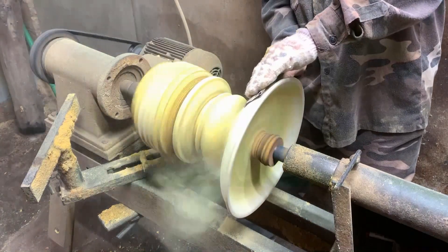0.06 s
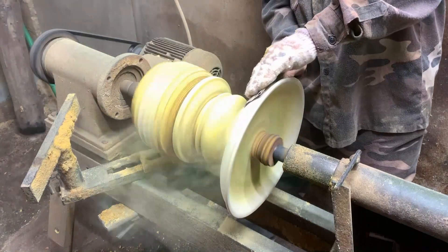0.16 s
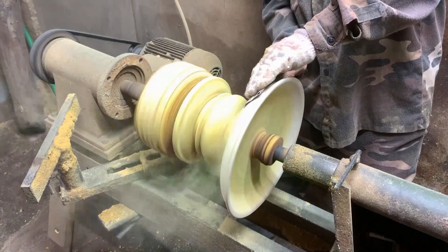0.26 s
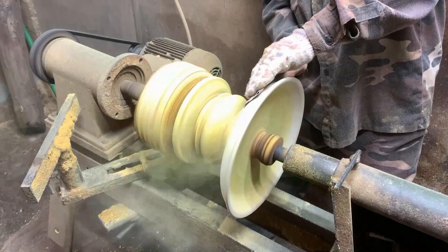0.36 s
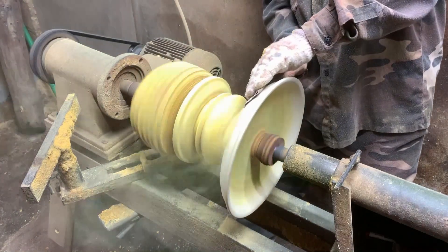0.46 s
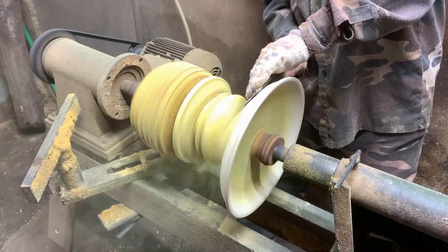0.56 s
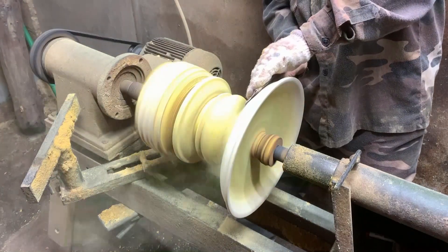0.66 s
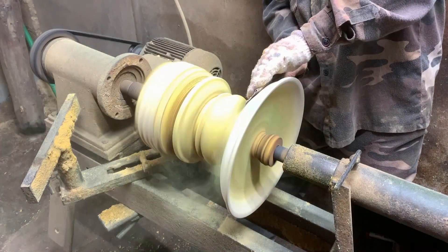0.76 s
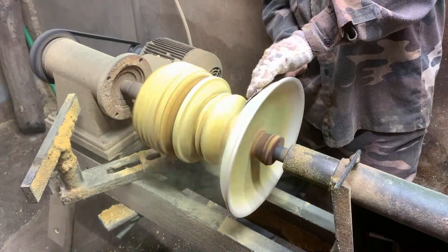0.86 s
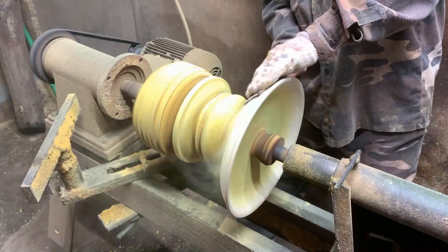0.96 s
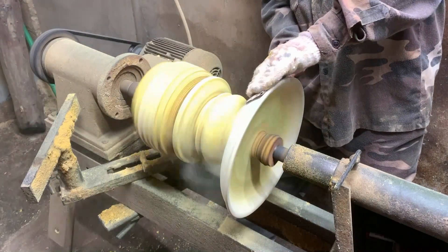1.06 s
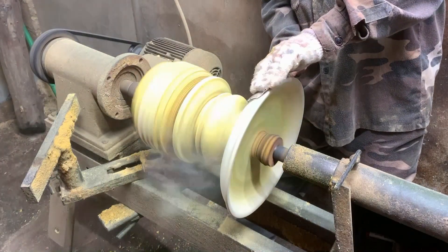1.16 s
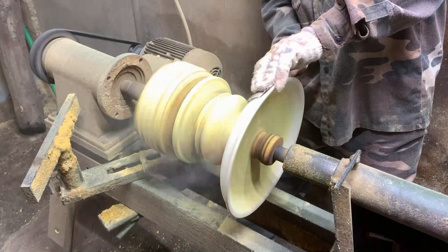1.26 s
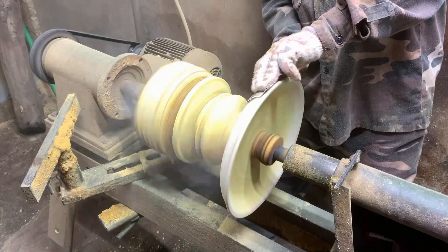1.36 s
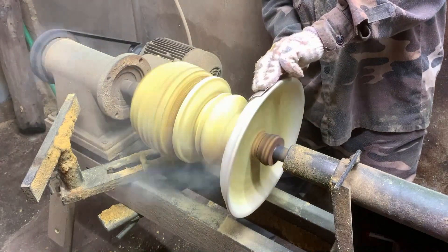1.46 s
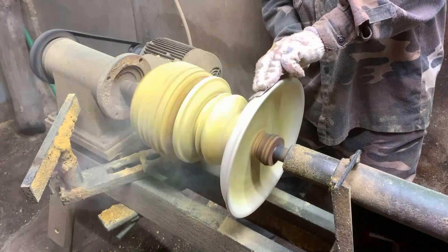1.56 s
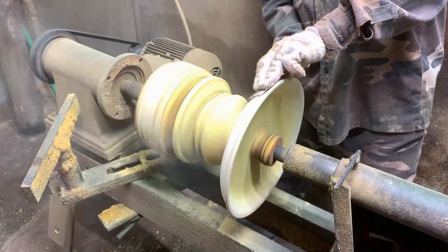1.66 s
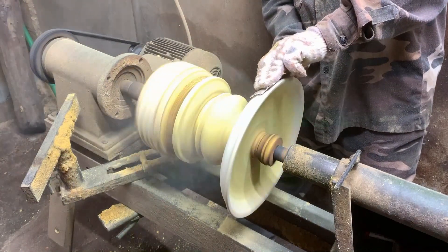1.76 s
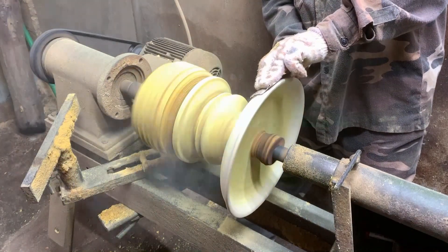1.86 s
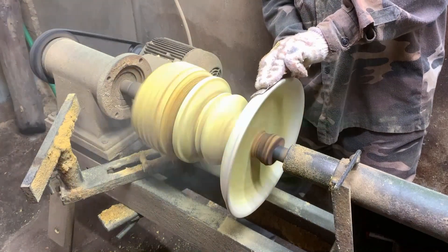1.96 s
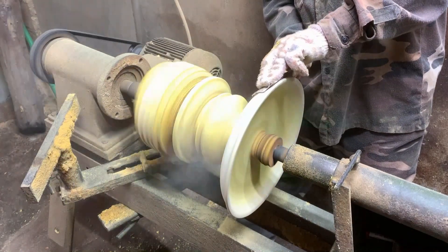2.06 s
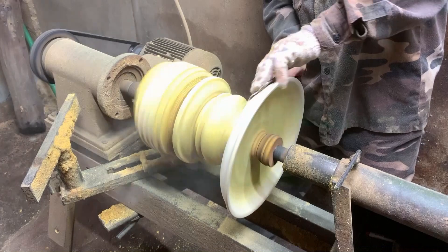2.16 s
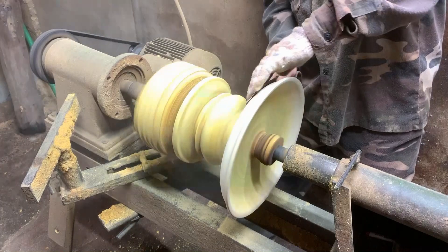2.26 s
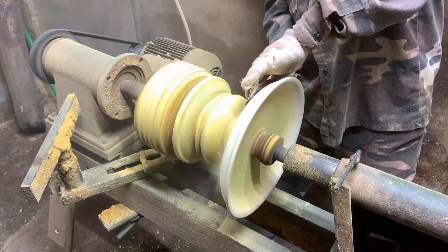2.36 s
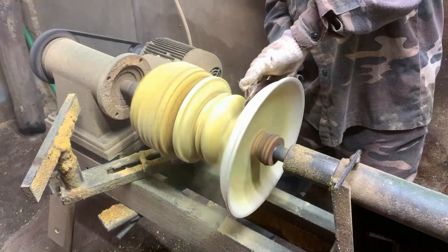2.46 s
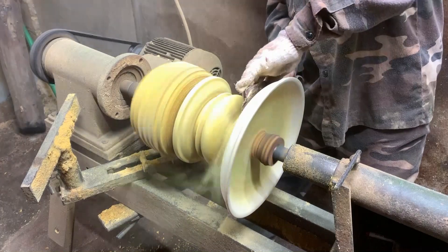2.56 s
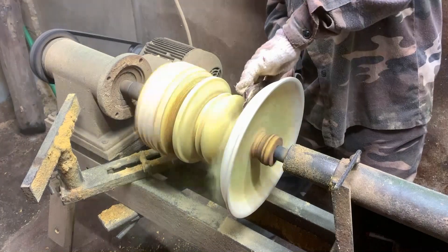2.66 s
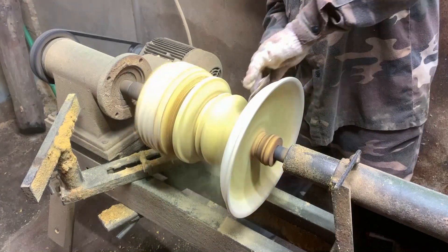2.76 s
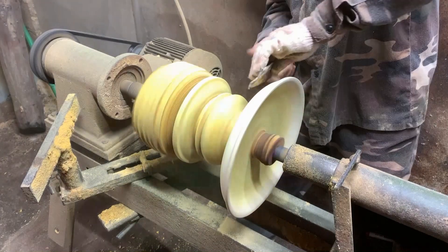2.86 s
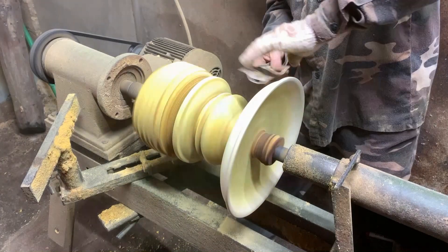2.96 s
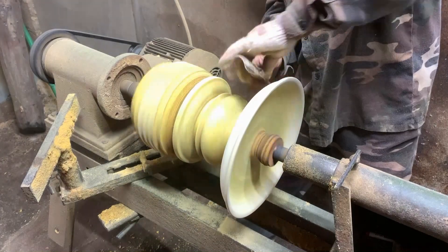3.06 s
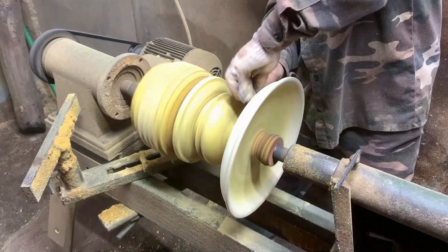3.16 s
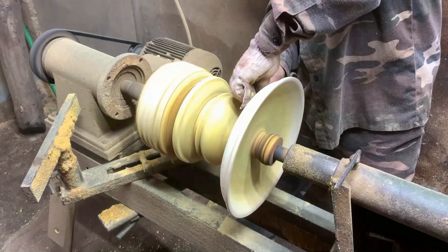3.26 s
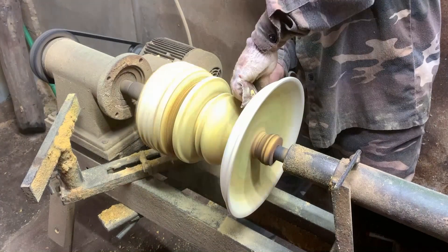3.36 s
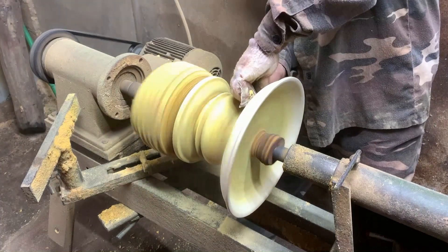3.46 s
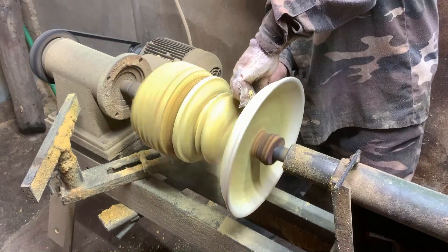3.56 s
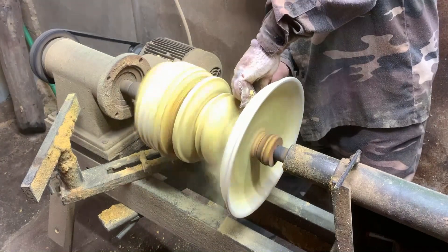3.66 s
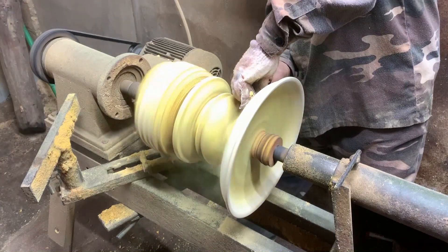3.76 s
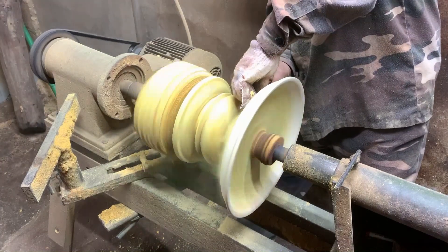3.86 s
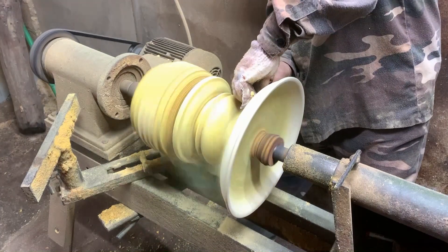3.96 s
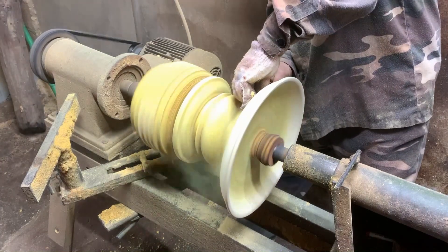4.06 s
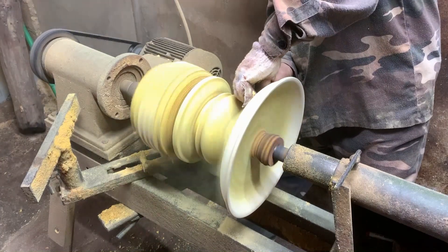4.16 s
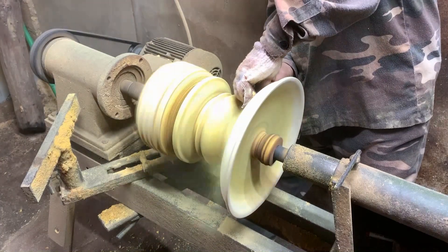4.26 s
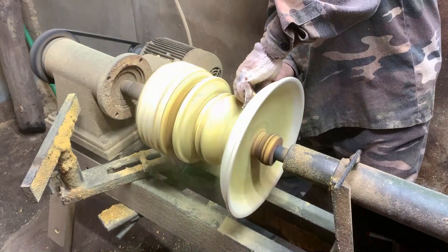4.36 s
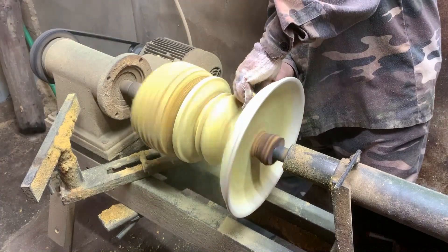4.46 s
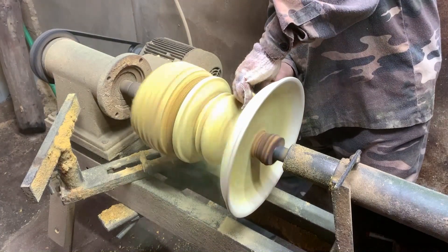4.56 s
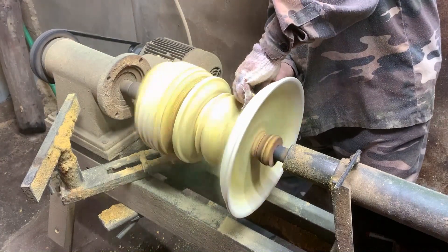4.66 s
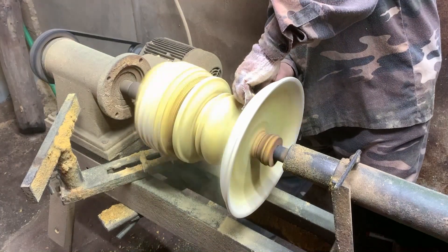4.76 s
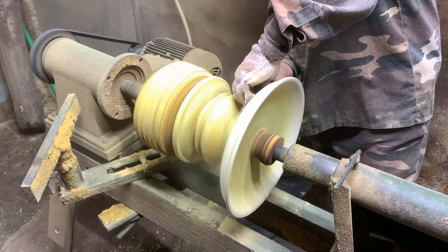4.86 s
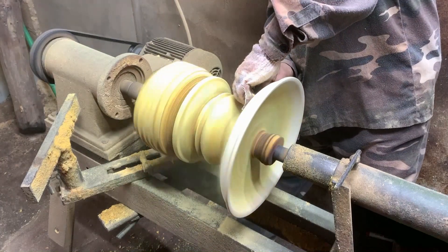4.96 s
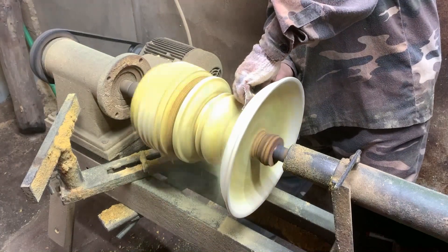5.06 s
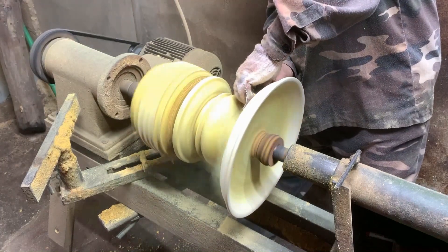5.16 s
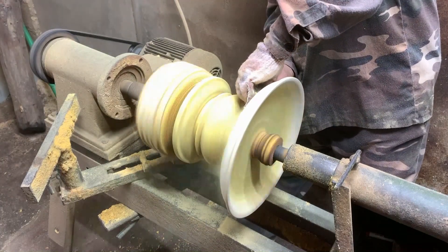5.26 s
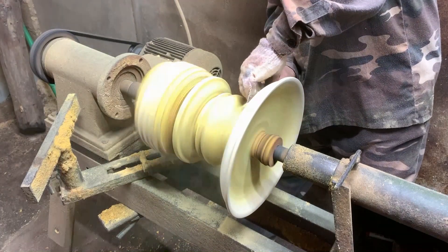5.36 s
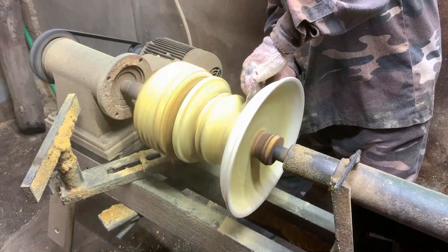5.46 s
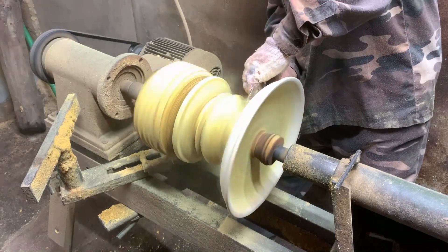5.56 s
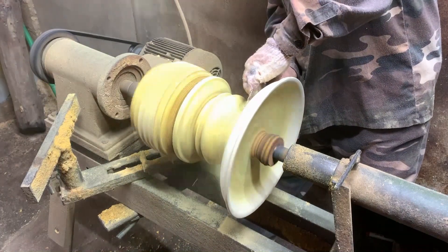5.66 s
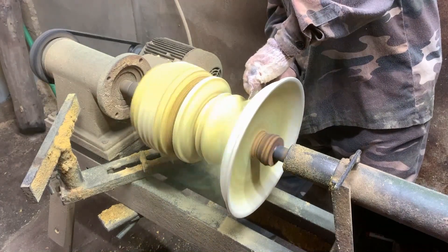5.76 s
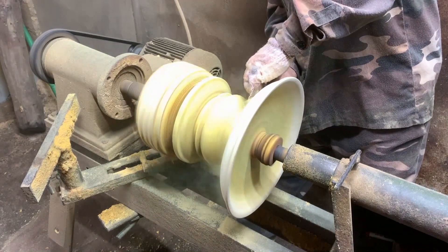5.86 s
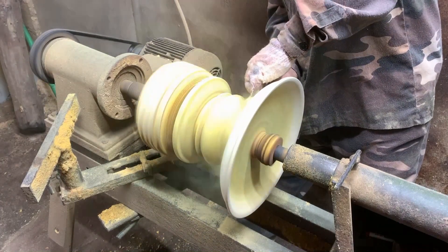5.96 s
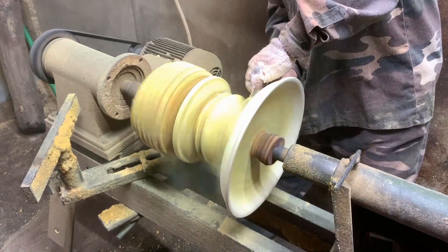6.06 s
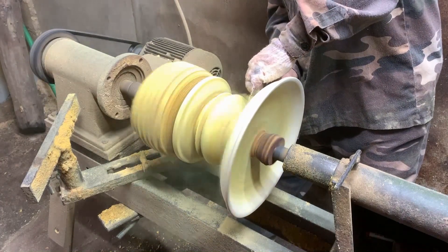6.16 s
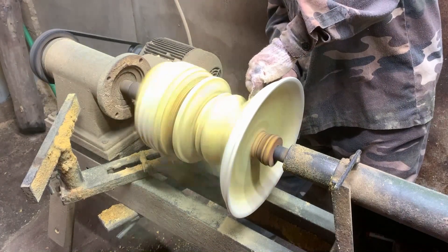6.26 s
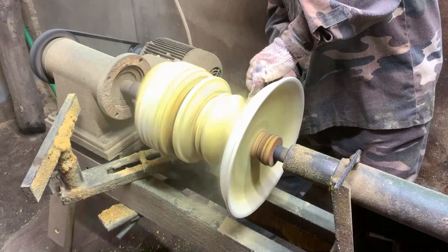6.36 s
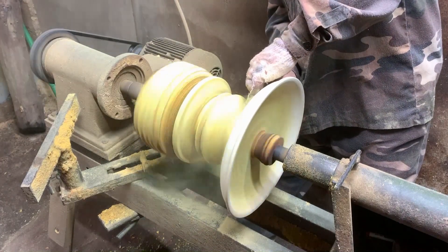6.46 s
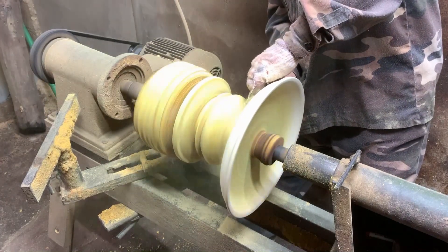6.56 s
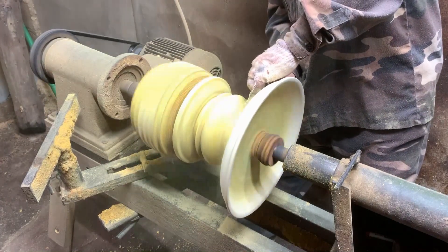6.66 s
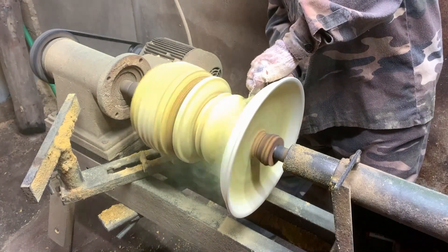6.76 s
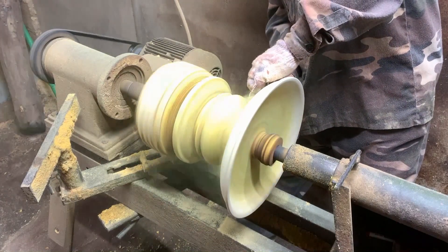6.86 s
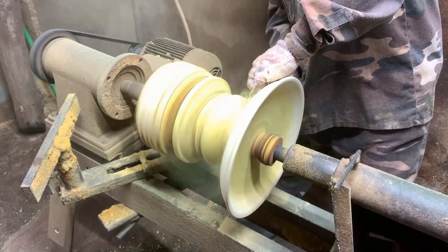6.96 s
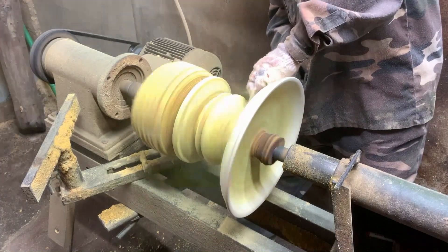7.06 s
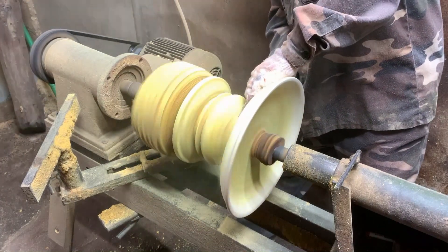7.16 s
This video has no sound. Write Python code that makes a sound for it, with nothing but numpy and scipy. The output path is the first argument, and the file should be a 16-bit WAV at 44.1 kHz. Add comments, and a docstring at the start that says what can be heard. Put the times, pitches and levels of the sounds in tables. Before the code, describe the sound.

A close stereo microphone in a workshop picks up sandpaper on wood spinning fast in a lathe. From 0 s a dense, dry, gritty hiss dominates, bright and finely uneven, easing around 0.6 s and pressing harder near 1.1 s, with a tiny dip at 2.2 s. Underneath are a softer broadband motor and bearing whirr, rapidly throbbing hollow resonances and very faint high whines. At about 2.8 s the paper lifts and the hiss cuts out, exposing the machine; one barely audible tick falls near 3.0 s. At 3.2 s the paper lands softly and sanding resumes, stronger at 3.5 s, lighter around 4.5 s and 5-5.6 s, with more body, then firmer and raspier from 6 s to the end at about 7.2 s. Low, lumpy draught rumbles throughout, with thumping air buffets near 0.25, 2.8, 3.7 and 4.6 s, the biggest at 5.2 s.

```python
"""In a workshop a wood lathe drones while sandpaper hisses on a spinning bowl, is lifted once and put back.
Sanding is a dense hail of uneven scratches, filtered by grit, hand pressure and place on the bowl.
The lathe is filtered noise, resonances throbbing twice a turn, and faint whines; one thin tick is heard.
A draught at two microphone ports is lumpy low noise with single swings of pressure that fall in pitch."""
import sys
import numpy as np
from scipy import signal
from scipy.fft import rfft, irfft, next_fast_len
from scipy.io import wavfile
from scipy.ndimage import uniform_filter1d

SR = 44100
rng = np.random.default_rng(int(sys.argv[2]) if len(sys.argv) > 2 else 0)


def bounce(signal):
    """Save signal as a 16-bit WAV file at the path given by the first command-line argument."""
    frames = np.transpose(np.atleast_2d(signal))
    limited = np.clip(frames, -1, 1)
    pcm = np.round(limited * 32767).astype(np.int16)
    wavfile.write(sys.argv[1], SR, pcm)


N = 318395
SIZE = next_fast_len(N)  # transform length

# Contacts of paper and wood: down_s, lifted_s
CONTACTS = [(-1, 2.766), (3.212, 9)]
# Pressure of the hand, as base level of the hiss: time_s, level_db
PRESSURE = [(0, -29.7), (.4, -30), (.62, -33.8), (.88, -32), (1.03, -27.8), (1.2, -27.5), (1.5, -30.5),
            (2.05, -30), (2.45, -30), (2.8, -31), (3.26, -31), (3.52, -28.3), (3.95, -31.5), (4.45, -35.5),
            (4.75, -31.5), (5.0, -34), (5.6, -34.2), (5.9, -31.8), (6.45, -29.5), (6.8, -32.5), (7.0, -31),
            (7.22, -28.5)]
# Brief dips of the hiss, including the soft start of the landing:
# time_s, depth_db, half_length_s (Gaussian sigma), fizz_kept_db
HISS_DIPS = [(2.235, -8, .04, 4.5), (3.215, -12, .027, -1), (3.325, -5.5, .035, 0), (7.075, -4, .02, 0)]
# Spectrum of the grit, relative: frequency_hz, density_db (per Hz)
GRIT_SPECTRUM = [(300, -35), (1000, -11), (2000, -9.5), (3000, -5.5), (4500, -2.5), (6500, -4), (7800, -6),
                 (8200, -5), (9200, -6.5), (9800, -8), (11000, -9), (13000, -14), (15500, -23.5)]
# Bands of body, scratch, rasp and fizz: centre_hz, width (log ratio), share of pressure changes ignored (0-1)
HISS_BANDS = [(1500, .3, .9), (4300, 0.15, .1), (6900, 0.16, .1), (11000, 0.7, .6)]
# Colour as the paper travels over the bowl: time_s, body_db, scratch_db, rasp_db, fizz_db
TRAVEL_COLOUR = [(0, -3, 0, 1, 2.5), (1.1, -3, .5, 1.5, 2), (1.9, -1, 0, .5, 4), (2.4, 1, .5, 2, 0),
                 (3.6, 2, 0, 0, 2), (4.3, 4, 2.5, 2, 1.5), (4.75, 5, 0, 3, -.5), (5.3, 6, 1, 3, 1.5),
                 (6.1, 2, 4.5, 5, -1), (7.22, 1, 3, 4, -1.5)]
# Spectrum of motor, belt and bearings, relative: frequency_hz, density_db (per Hz)
DRONE_SPECTRUM = [(150, -53), (250, -11.5), (400, -13), (620, -12.5), (900, -10), (1050, -15.5),
                  (1450, -12.5), (2000, -15), (3950, -28.5), (6820, -34), (9000, -45), (10300, -48),
                  (12700, -38), (13200, -66)]
# Resonances of the lathe: frequency_hz, width_hz (before WIDTH_SCALE), relative_peak_db
LATHE_MODES = [(797, 84, -2), (880, 88, -11), (1475, 64, -12.5), (1670, 86, -10.5), (1773, 89, -10.5),
               (2580, 66, -18.5), (5010, 130, -20), (5970, 130, -19), (6680, 90, -21), (6900, 90, -22)]
# Loudness of the resonances together: time_s, level_db
MODE_LEVEL = [(0, -41), (1.5, -41), (3.0, -40), (3.8, -37.5), (5.0, -36.5), (7.22, -36)]
# Whines of the drive: frequency_hz, level_db (before flutter)
WHINES = [(10907, -75), (12016, -65.5), (12801, -80)]
# Strength of the draught: time_s, level_db (before lumps), boost_above_200_hz_db (before flicker)
DRAUGHT_STRENGTH = [(0, -34.5, -4), (.12, -35, -5), (.3, -27.5, -1), (.52, -42, -8), (.78, -40.5, 2),
                    (.9, -33, -4), (1.07, -46, 2), (1.27, -36.5, 0), (1.57, -35, 0), (1.72, -43.5, -5),
                    (2.03, -31.5, -3), (2.15, -37, 0), (2.26, -32.5, -2), (2.44, -40, 0), (2.6, -32.5, -1),
                    (2.82, -30, -4), (3.05, -31, -7), (3.25, -36, 0), (3.4, -46, 6), (3.6, -40, 2),
                    (3.72, -33, 5), (3.93, -34, 0), (4.08, -45, -2), (4.5, -29.5, -3), (4.62, -35, 0),
                    (4.74, -29, 4), (4.96, -46, 2), (5.19, -24, 3), (5.3, -28.5, 0), (5.47, -26, -7),
                    (5.66, -42, 4), (5.87, -32, -3), (6.1, -35, 2), (6.22, -39, 0), (6.62, -36, 2),
                    (6.77, -29, -2), (6.9, -35.5, -3), (7.1, -36.5, 4), (7.22, -29, 7)]
# Spectrum of the turbulence, relative: frequency_hz, density_db (per Hz)
TURBULENCE_SPECTRUM = [(8.8, -43), (15, -8), (86, -0.5), (286, -10.5), (521, -17.5), (650, -18), (840, -49),
                       (1430, -120)]
# Single buffets: start_s, envelope_peak_db, settled_pitch_hz, snap_db (re swing), left_over_right_db
BUFFETS = [(0.241, -18.5, 140, -24, 0), (0.268, -18.5, 100, -5, 4), (1.613, -26.5, 94, -18, -4),
           (1.984, -25, 80.7, -24, -5), (2.275, -22, 99, -10, 1), (2.647, -26, 117, -20, 1.5),
           (2.773, -20.5, 96.9, -19, 0.5), (2.936, -23, 99.6, -24, -0.5), (3.673, -19, 74.4, -21, 5),
           (3.684, -18.5, 82, -1.5, -1), (3.747, -23, 101, -12, 0.0), (3.817, -24, 133, -7, 0.5),
           (4.516, -20.5, 61.9, -13, -5), (4.682, -20.5, 90, -1, 1), (4.749, -25.5, 96, -8, 7),
           (5.079, -21.5, 105, -17, -2), (5.16, -9.5, 77.5, -6, 0.5), (5.193, -22, 91.5, -9, -3),
           (5.346, -19, 85, -22, -1.0), (5.362, -20, 107, -19, -1), (5.398, -21.5, 111, -9.5, 1),
           (5.818, -23.5, 103, -18, 2), (6.147, -23, 78.1, -18, 0.5), (6.734, -21.5, 83.4, -23, -6),
           (6.798, -18.5, 85, -14, 4), (7.155, -25, 98, -0.5, 1)]
# Treble resonance of the right port: frequency_hz, gain_db
RIGHT_PORT = [(7940, 0), (8030, 6.5), (9350, 6), (9850, 0)]

LAND_DB_PER_S, LIFT_DB_PER_S = 1000, 360  # slopes at which the hiss comes and goes
USUAL_PRESSURE_DB = -31
TURNS_PER_S = 17.7
DRONE_DB = -38.5
WIDTH_SCALE = 1.22  # table width to full width at half amplitude
TICK_S, TICK_DB, TICK_DECAY_S = 2.983, -51, 0.059  # decay time to -60 dB
BAND_LIMIT_HZ = 15740


def gain_of(db):
    """Decibel law: amplitude ratio of a level."""
    return 10 ** (np.asarray(db) / 20)


def evened(x):
    """Normalisation: scales a signal to rms 1."""
    return x / np.sqrt(np.mean(x ** 2) + 1e-20)


def noise():
    """White noise: equal power per hertz, independent in two channels."""
    return rng.standard_normal((2, N))


def read(points, hz):
    """Interpolation of a spectrum on a logarithmic frequency axis."""
    f, value = np.transpose(points)
    return np.interp(np.log(hz + 1), np.log(f + 1), value)


def coloured(x, points):
    """Linear filtering: multiplies the spectrum of x by the points' gains, then sets rms 1."""
    gains = gain_of(read(points, np.fft.rfftfreq(SIZE, 1 / SR)))
    return evened(irfft(rfft(x, SIZE) * gains, SIZE)[..., :N])


def wander(seconds, channels=2):
    """Low-pass fluctuation: noise averaged twice over the given time, rms 1."""
    span = max(round(seconds * SR), 1)
    once = uniform_filter1d(rng.standard_normal((channels, N)), span)
    return evened(uniform_filter1d(once, span))


def spin(order):
    """Periodicity of rotation: a cosine at a multiple of the spindle speed."""
    return np.cos(2 * np.pi * order * TURNS_PER_S * np.arange(N) / SR + 2 * np.pi * rng.random())


def hand(t):
    """Contact force: pressure level, dips with landing and lifting, and fizz kept in the dips, all in dB."""
    s, depth_db, half_s, kept_db = np.transpose(HISS_DIPS)
    dips = np.exp(-.5 * ((t[:, None] - s) / half_s) ** 2)
    fades = []
    for down, lifted in CONTACTS:
        landing = LAND_DB_PER_S * (t - down)
        lifting = LIFT_DB_PER_S * (lifted - t)
        fades.append(np.minimum(np.minimum(landing, lifting), 0))
    pressure_db = np.interp(t, *np.transpose(PRESSURE))
    return pressure_db, dips @ depth_db + np.max(fades, axis=0), dips @ kept_db


def sanding():
    """Abrasion noise: grit tears fibres in a hail of scratches; grain and run-out pulse with each turn."""
    hail = noise() * gain_of(1.87 * np.minimum(rng.exponential(1, N), 4))
    edge_band = signal.butter(1, [53, 64], "bandpass", fs=SR, output="sos")
    flutter = evened(signal.sosfilt(edge_band, rng.standard_normal(N)))  # the paper's free edge
    turn_db = .35 * spin(order=1) + .25 * spin(order=2)
    pulse_db = turn_db + .45 * flutter + 0.18 * wander(.03, channels=1)
    scratches = coloured(hail, GRIT_SPECTRUM) * gain_of(pulse_db)
    hz, t, z = signal.stft(scratches, SR, nperseg=512, noverlap=384)

    s, *columns = np.transpose(TRAVEL_COLOUR)
    *bands_db, fizz_db = (np.interp(t, s, c) for c in columns)
    pressure_db, dips_db, kept_db = hand(t)
    bands_db = bands_db + [fizz_db + kept_db]
    field_db = pressure_db + dips_db
    for (centre, width, ignored), band_db in zip(HISS_BANDS, bands_db):
        weight = np.exp(-.5 * (np.log((hz + 1) / centre) / width) ** 2)[:, None]
        field_db = field_db + weight * (band_db + ignored * (USUAL_PRESSURE_DB - pressure_db))

    # axis 1 is frequency, axis 2 is time
    across = uniform_filter1d(rng.standard_normal(z.shape), 7, 1)
    patches = evened(uniform_filter1d(across, 110, 2))  # the paper flexes
    # random brief narrow-band unevenness of the hiss
    streaks = evened(uniform_filter1d(rng.standard_normal(z.shape), 9, 2))
    sides_db = np.array([-.4, .4])[:, None, None]  # the work stands a little to the right
    z = z * gain_of(field_db + 0.84 * patches + 4.14 * streaks + sides_db)
    return signal.istft(z, SR, nperseg=512, noverlap=384)[1][:, :N]


def drone():
    """Broadband machine noise: motor, belt and bearings as noise of a steady spectrum."""
    return gain_of(DRONE_DB) * coloured(noise(), DRONE_SPECTRUM)


def resonances():
    """Modal resonance: noise that swells twice a turn excites the narrow modes of the lathe."""
    hz = np.fft.rfftfreq(SIZE, 1 / SR)
    modes = sum(gain_of(db) / (1 + (2 * (hz - f) / (WIDTH_SCALE * w)) ** 2) for f, w, db in LATHE_MODES)
    knocks_db = 3.3 * spin(order=2) + 1.82 * wander(0.026, channels=1) + 2.6 * wander(0.041)
    knocks = noise() * gain_of(knocks_db)
    rung = evened(irfft(rfft(knocks, SIZE) * modes, SIZE)[:, :N])
    return rung * gain_of(np.interp(np.arange(N) / SR, *np.transpose(MODE_LEVEL)))


def whines():
    """Phase and amplitude modulation: thin tones of the drive waver together and flutter in level."""
    t = np.arange(N) / SR
    waver = 1.3 * wander(.006)  # radians
    tones = sum(gain_of(db) * np.sqrt(2) * np.sin(2 * np.pi * f * t + waver) for f, db in WHINES)
    return tones * gain_of(2.8 * wander(.015))


def lathe():
    """Superposition of the lathe's broad drone, its throbbing resonances and its whines."""
    return drone() + resonances() + whines()


def draught():
    """Turbulent pressure: the ports share part of the low noise; the upper part flickers."""
    s, *columns = np.transpose(DRAUGHT_STRENGTH)
    level_db, bright_db = (np.interp(np.arange(N) / SR, s, c) for c in columns)
    shared, *own = rng.standard_normal((3, N))
    smooth = signal.butter(2, 200, fs=SR, output="sos")
    mixed = 0.71 * signal.sosfiltfilt(smooth, shared) + np.array(own)
    air = coloured(mixed, TURBULENCE_SPECTRUM)
    low = signal.sosfiltfilt(smooth, air)
    flicker_db = 4.0 * wander(0.011, channels=1)
    high = gain_of(bright_db + flicker_db) * (air - low)
    lumps_db = 1.8 * wander(.015, channels=1) + 2.2 * wander(.015)
    return (low + high) * gain_of(level_db + lumps_db)


def buffets():
    """Transient pressure pulses: a short swing falling in pitch, with a quicker falling snap."""
    out, t = np.zeros((2, N + SR)), np.arange(SR // 10) / SR
    chance = rng.random((len(BUFFETS), 2))
    # both envelopes peak at 1, after 7 ms and 2.5 ms
    swing_envelope = t / .007 * np.exp(1 - t / .007)
    snap_envelope = t / .0025 * np.exp(1 - t / .0025)
    snap_cycles = 200 * t + 1.26 * (1 - np.exp(-t / 0.0041))  # falls from about 507 to 200 Hz
    for (s, db, hz, snap_db, pan_db), (phase, skew) in zip(BUFFETS, chance):
        start = 2 * np.pi * (phase + np.outer([.5, -.5], .5 * (skew - .5)))  # the ports are not quite in step
        swing_cycles = hz * (t + .007 * (1 - np.exp(-t / .005)))  # starts at 2.4 times its settled pitch
        swing = np.sin(2 * np.pi * swing_cycles + start) * swing_envelope
        snap = np.sin(2 * np.pi * snap_cycles + start) * snap_envelope
        sides = gain_of(db + np.outer([.5, -.5], pan_db))
        at = round(s * SR)
        out[:, at:at + len(t)] += sides * (swing + gain_of(snap_db) * snap)
    return out[:, :N]


def tick():
    """Exponential decay: one faint burst of treble noise while the paper is off the wood."""
    after = np.arange(N) / SR - TICK_S
    spectrum = [(5000, -25), (8500, -3), (11300, 0), (12500, -25), (13500, -60)]  # Hz, relative dB
    decay = (after > 0) * gain_of(-60 * np.clip(after, 0, 1) / TICK_DECAY_S)
    return gain_of(TICK_DB) * coloured(noise(), spectrum) * decay


def scene():
    """Superposition: the pressures of all sources add."""
    return sanding() + lathe() + draught() + buffets() + tick()


def record(dry):
    """Linear reception: the right port colours the treble, then a low-pass filter limits the band."""
    port_db = read(RIGHT_PORT, np.fft.rfftfreq(SIZE, 1 / SR))
    ring = gain_of(np.outer([0, 1], port_db))  # left flat, right ringing
    heard = irfft(rfft(dry, SIZE) * ring, SIZE)[:, :N]
    low_pass = signal.firwin(2047, BAND_LIMIT_HZ, window=("kaiser", 9), fs=SR)
    return signal.oaconvolve(heard, low_pass[None], "same")


dry = scene()
out = record(dry)
bounce(out)
```